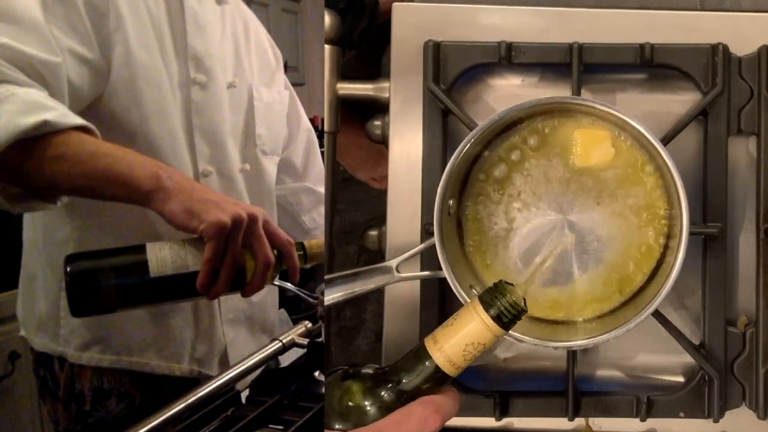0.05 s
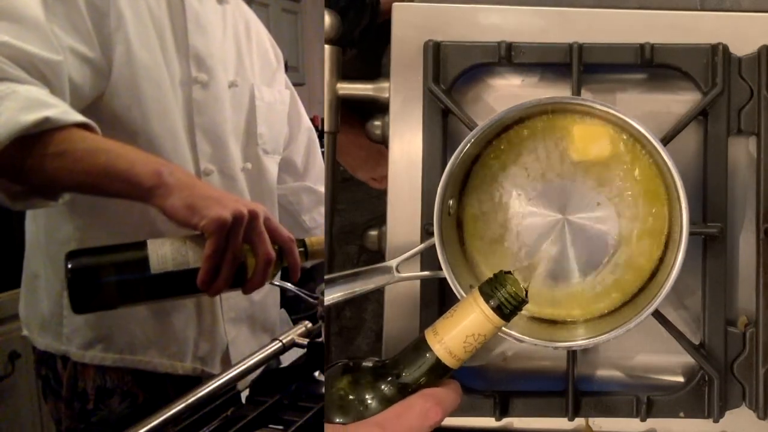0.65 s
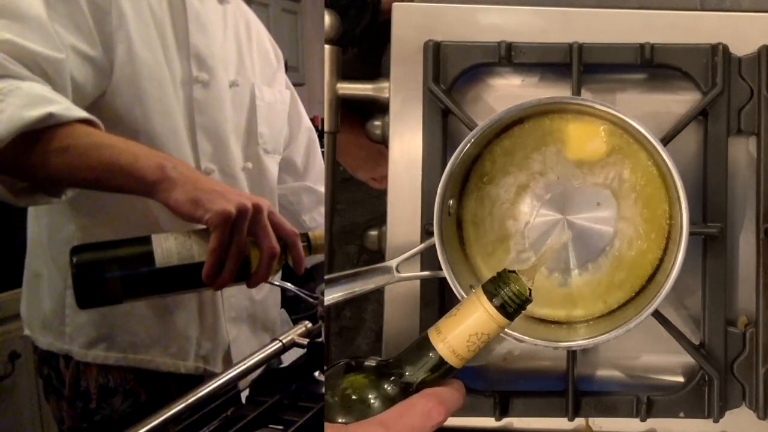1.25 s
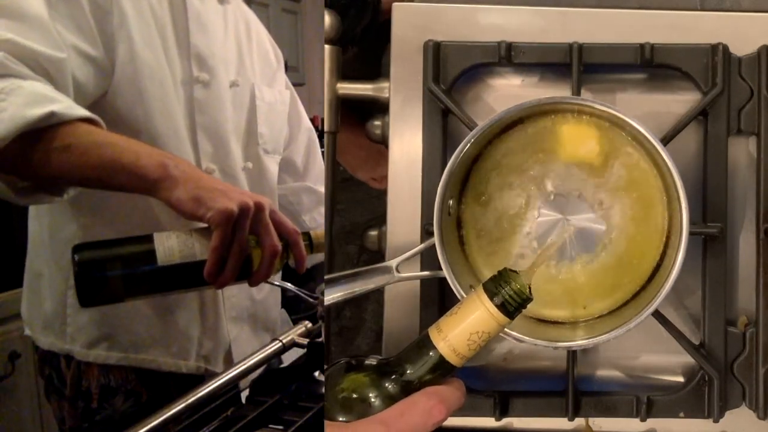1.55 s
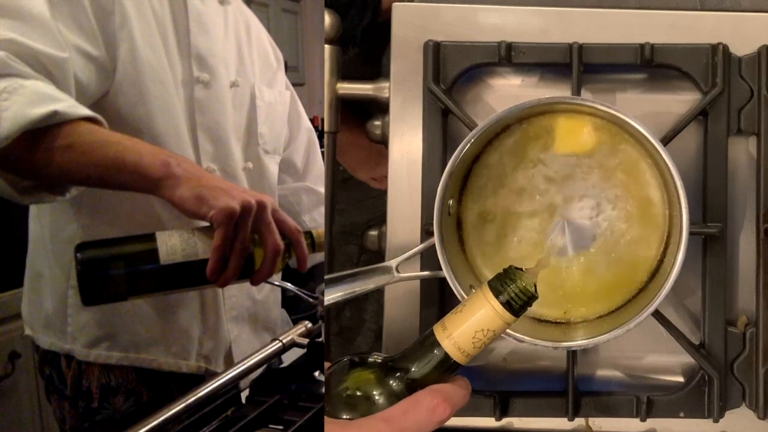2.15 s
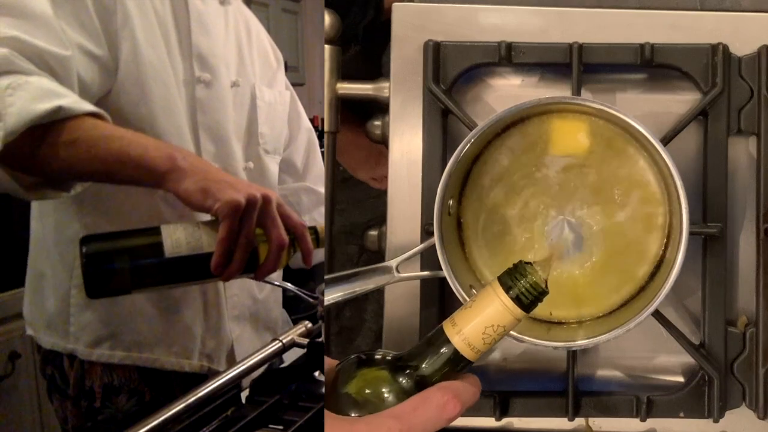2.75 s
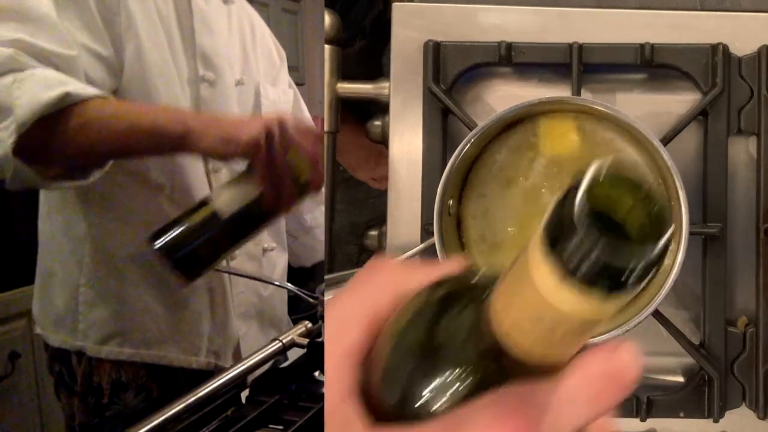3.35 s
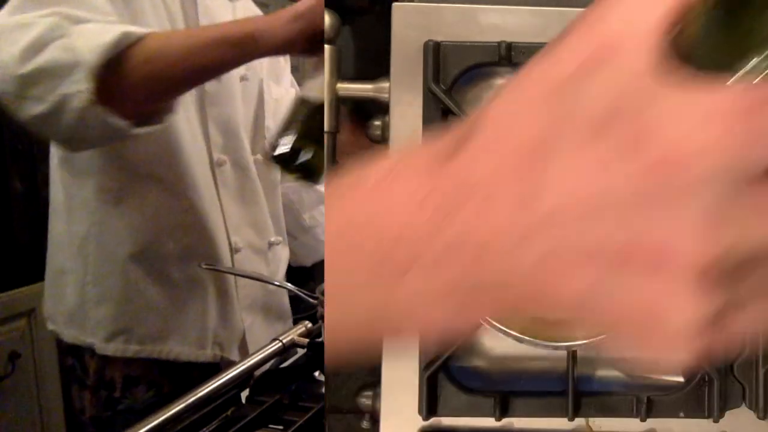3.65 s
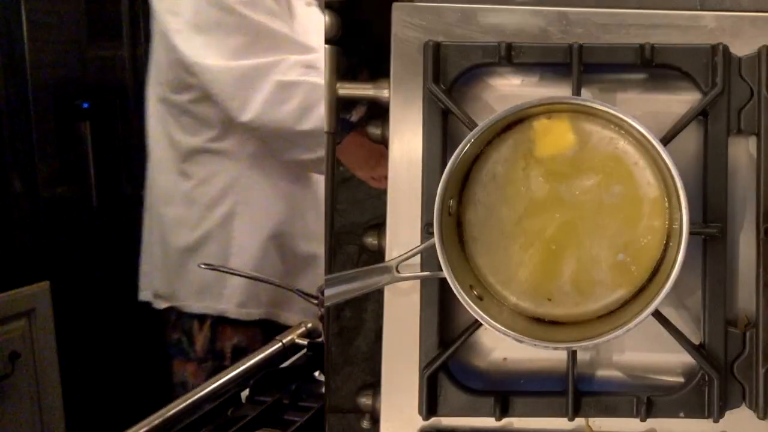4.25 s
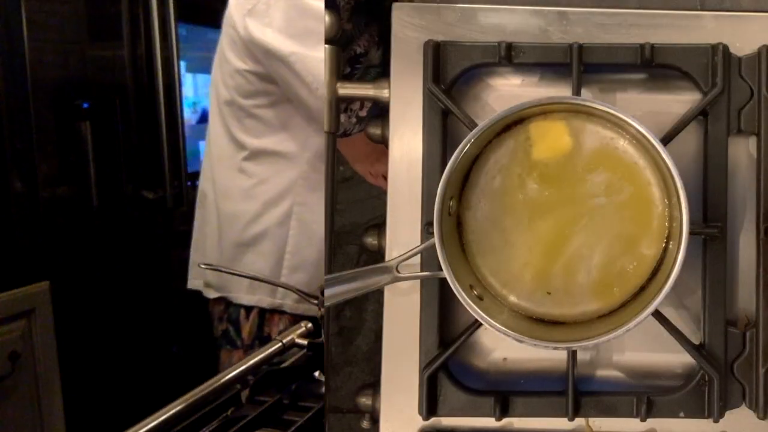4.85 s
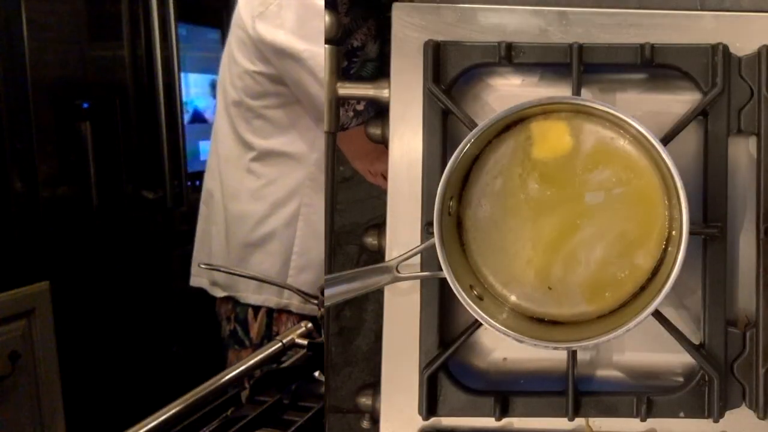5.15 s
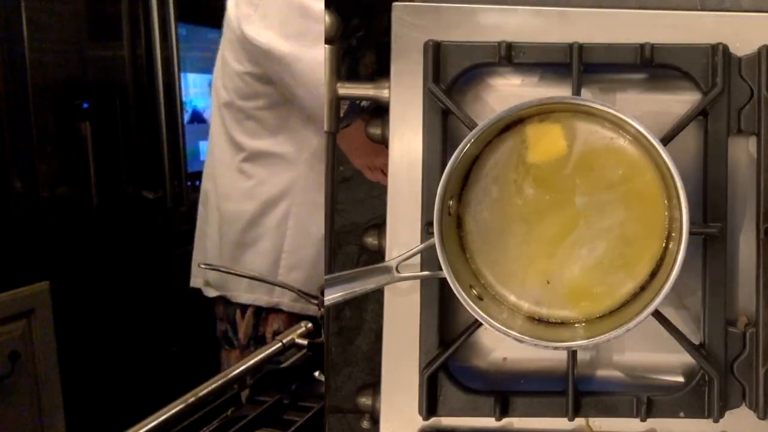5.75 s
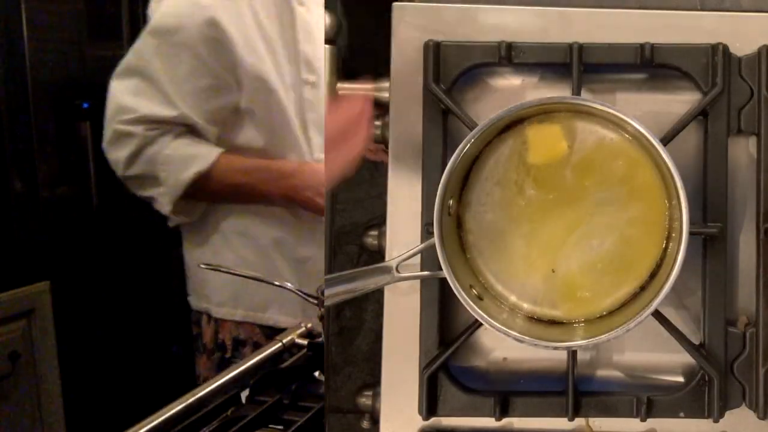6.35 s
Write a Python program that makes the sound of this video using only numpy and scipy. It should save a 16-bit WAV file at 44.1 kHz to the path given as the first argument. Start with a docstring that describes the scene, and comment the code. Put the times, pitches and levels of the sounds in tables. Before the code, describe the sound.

Wine splashes into a hot buttered pan, crackling and spitting, then a glass bottle knocks down hard and rocks beside the stove.

```python
"""A small kitchen, one microphone close to the stove. Wine is poured into a hot steel pan of butter and oil.
It splashes, and its drops flash to steam under the fat: short pitched spits, dry pops and round bubble
notes over a crackle and a fine fizz, all ringing in the pan and dying down as it cools. The bottle is then
set down hard beside the stove and rocks three times on its base. The gas burner rushes faintly behind."""
import sys
import numpy as np
from scipy import signal
from scipy.fft import rfft, irfft, next_fast_len
from scipy.io import wavfile
from scipy.ndimage import uniform_filter1d

SR = 44100
rng = np.random.default_rng(int(sys.argv[2]) if len(sys.argv) > 2 else 0)


def store_pcm(level_fs):
    """Save levels as 16-bit WAV."""
    pcm = np.round(np.clip(level_fs, -1, 1) * 32767).astype(np.int16)
    wavfile.write(sys.argv[1], SR, np.atleast_2d(pcm).T)


N = 282681
TIME = np.arange(N) / SR

# Levels in the tables are relative: each source adds its own gain.
# the loudest single steam bursts: (time [s], pitch [Hz], level [dB])
STEAM_SPITS = [(0.043, 6780, -25), (0.061, 6200, -31.5), (0.065, 4290, -29.5), (0.08, 3945, -28.5),
               (0.102, 9700, -35), (0.146, 6370, -28), (0.146, 3960, -32), (0.148, 9380, -32.5),
               (0.217, 8300, -36), (0.281, 3970, -33.5), (0.302, 3580, -29), (0.315, 3820, -28),
               (0.329, 6220, -29), (0.352, 6980, -23), (0.364, 4120, -30.5), (0.387, 4850, -29),
               (0.395, 8240, -21.5), (0.441, 4630, -28), (0.495, 3320, -31), (0.51, 7780, -26.5),
               (0.523, 5000, -29.5), (0.54, 3750, -29.5), (0.588, 3290, -33.5), (0.605, 4090, -32.5),
               (0.722, 3550, -41), (0.779, 6640, -28.5), (0.909, 6860, -34), (0.93, 7530, -32.5),
               (0.994, 9600, -33), (1.008, 3986, -31.5), (1.046, 4215, -30), (1.207, 5530, -36.5),
               (1.359, 4700, -31.5), (1.428, 5010, -29.5), (1.458, 2645, -33.5), (1.659, 9210, -24.5),
               (1.661, 4470, -29), (1.765, 7590, -28.5), (1.776, 5120, -32.5), (1.957, 3560, -29.5),
               (1.994, 4940, -30.5), (2.94, 5600, -31.5), (4.018, 7820, -38.5), (4.646, 6570, -37),
               (4.706, 6670, -38.5), (4.764, 8640, -35), (4.918, 8560, -45), (5.072, 7630, -41.5),
               (5.55, 7900, -35), (5.643, 7040, -36.5), (5.693, 7900, -36.5), (5.735, 4870, -43.5),
               (5.926, 6300, -38.5)]
# hot fat spits, a cooled pool only hisses: (time [s], spitting share [0-1], bubble pitch [Hz])
PAN_HEAT = [(0, 0.9, 5490), (.65, 0.9, 2560), (1.9, 0.6, 2930), (2.35, 0.45, 4040), (2.65, 0.04, 4520),
            (4.2, 0, 6400), (5.3, 0, 7070), (5.7, 0.89, 6270), (5.95, 0.9, 6030), (6.1, 0, 5920)]
# the simmer grows as wine gathers and dies down as the pan cools: (time [s], level [dB])
SIMMER_LEVEL = [(0, -43), (.23, -74.5), (.55, -67), (.72, -63.5), (.85, -58), (1.55, -60.5), (1.95, -50),
                (2.7, -52.5), (3.5, -53), (3.8, -58.5), (4.2, -69), (4.5, -60.5), (5.05, -69), (5.5, -65.5),
                (5.85, -60.5), (6.05, -66.5), (6.41, -78.5)]
# wine boils up on a hot patch: (time [s], hold [s], crackle [dB], fizz [dB], bubble pitch [Hz])
BOIL_UPS = [(0.02, 0.11, -51, -71, 5940), (0.276, 0.13, -45.5, -72, 4110), (0.409, 0.13, -44.5, -60, 3615),
            (0.743, 0.052, -51, -98, 3400), (0.831, 0.034, -54, -54, 2280), (0.893, 0.031, -54, -53, 7950),
            (0.988, 0.032, -49, -60, 3660), (1.192, 0.03, -47.5, -84, 4300),
            (1.353, 0.089, -51.5, -85, 3594), (1.689, 0.06, -51.5, -53, 3510),
            (1.838, 0.035, -46, -62, 4150), (1.974, 0.11, -38.5, -58, 3940),
            (2.077, 0.087, -39, -45.5, 4940), (2.231, 0.026, -47, -62, 4640),
            (2.38, 0.078, -35.5, -40.5, 3980), (2.533, 0.038, -45, -48, 6580),
            (2.718, 0.016, -57.5, -44.5, 7260), (2.872, 0.12, -45.5, -49.5, 5420),
            (3.189, 0.22, -47.5, -45.5, 5510), (4.246, 0.066, -60.5, -62, 6800),
            (5.542, 0.03, -51, -47.5, 7900), (5.624, 0.056, -61, -59, 6970),
            (5.703, 0.0177, -56.5, -84, 5040), (5.742, 0.031, -59.5, -57, 6940),
            (5.867, 0.032, -56, -78, 6100)]
# spectra of the cooled pool's hiss and of its finer fizz: (frequency [Hz], level [dB])
HISS_SPECTRUM = [(200, -52), (1000, -28), (1650, -9), (2300, -11.5), (3300, -4.5), (6300, -1),
                 (15000, -16.5)]
FIZZ_SPECTRUM = [(400, -60.5), (2000, -16.5), (6000, -7.5), (8500, 6.5), (11000, -2.5), (16000, 2)]
# oil bubbles snapping: (time [s], level [dB])
OIL_POPS = [(0.009, -28), (1.879, -27.5), (2.006, -24.5), (2.091, -26), (2.258, -27), (2.273, -26.5),
            (2.306, -23.5), (2.329, -21.5), (2.558, -28.5), (2.587, -28), (2.62, -26), (2.731, -34),
            (2.804, -25.5), (2.96, -32), (3.209, -33), (3.269, -21), (3.283, -23), (3.329, -24),
            (3.343, -26), (3.3595, -18), (3.493, -35), (4.47, -38), (4.845, -50), (4.95, -43)]
# mist thrown up where a drop bursts in the fat: (time [s], level [dB])
MIST_PUFFS = [(0.15, -43), (0.32, -44), (0.385, -39), (0.441, -38), (0.496, -41), (0.608, -44),
              (0.857, -37), (0.895, -43), (0.993, -37), (1.178, -57), (1.396, -49), (1.762, -39),
              (1.854, -50)]
# air bubbles in the deepening pool: (time [s], pitch [Hz], level [dB], width [s])
BUBBLE_NOTES = [(0.835, 1670, -44, 0.015), (1.937, 3260, -36.5, 0.0079), (2.331, 2920, -31.5, 0.0097),
                (2.361, 3400, -30, 0.01), (3.11, 2974, -40.5, 0.015), (3.215, 1386, -47, 0.013),
                (3.25, 2940, -40.5, 0.022), (3.388, 1630, -48, 0.016), (3.403, 3280, -39, 0.014)]
# gulps of wine landing, large bubbles breaking: (time [s], level [dB], plop against slap [dB])
GULPS = [(0.075, -48.5, 5), (0.463, -37, -0.5), (0.791, -39.5, 3.5), (0.829, -33.5, 0),
         (1.125, -40.5, -0.5), (1.181, -37, -4), (1.298, -38, -3), (1.366, -33.5, 7), (1.697, -37.5, -15),
         (1.716, -40.5, -5), (1.796, -35, 1), (1.952, -31, -16)]
# patter of the falling wine: (frequency [Hz], level [dB])
PATTER_SPECTRUM = [(100, -28), (330, -8.5), (650, -4.5), (1000, -8.5), (1600, -6), (2200, -13.5),
                   (3000, -1.5), (12000, -22)]
# the stream on the bare pan floor: (time [s], level [dB])
DRUMMING_LEVEL = [(.5, -110), (.6, -66), (1.3, -67), (2.05, -74.5), (3, -110)]
# the air in the pan and its steel wall: (frequency [Hz], level [dB], t60 [s])
PAN_RESONANCES = [(860, -8.5, 0.065), (1200, -9.5, 0.057), (1592, -1.5, 0.024), (1643, -3, 0.068),
                  (2990, -12, 0.03), (3240, -12, 0.057), (4130, -10, 0.017), (4470, -13, 0.0091),
                  (4940, -5.5, 0.017), (5560, -8, 0.03), (7050, -0.5, 0.014), (8500, -5, .012)]
# the bottle's base meets the counter: (time [s], level [dB], treble cutoff [Hz], glass ring [dB])
BOTTLE_BLOWS = [(5.0873, -4.5, 2900, -31), (5.0902, -0.5, 15300, -13), (5.0955, -8, 6350, -26),
                (5.108, -17, 9000, -34), (5.258, -11.5, 1320, -14), (5.283, -14, 775, -16),
                (5.358, -15.5, 1550, -9), (5.367, -15, 1520, -5), (5.457, -10, 1230, -18),
                (5.471, -16.5, 1530, -8.5)]
# counter and stove top ringing under the bottle: (frequency [Hz], level [dB], t60 [s])
COUNTER_MODES = [(135, -10, 0.53), (233, -9, 0.45), (276, -2.5, 0.41), (318.4, -3.5, 0.75),
                 (385, -2.5, 0.25), (443, 5, 0.29), (593, -4, 0.45), (776, 7.5, 0.14), (874, -1.5, 0.39),
                 (960, 10, 0.14), (1030, -6.5, 0.33), (1148, -1.5, 0.34), (1440, -1, 0.15),
                 (1607, -0.5, .12), (1736, 3, 0.17), (2620, 4.5, 0.14), (3004, 0.5, 0.31), (4720, -3, 0.19),
                 (4830, -3.5, 0.26)]
# their dense rattle: (frequency [Hz], level [dB])
RATTLE_SPECTRUM = [(29, -64.5), (50, -23), (111, -16), (291, -6), (1120, -7), (2620, -11.5), (3330, -17.5),
                   (4790, -14), (5150, -21), (7040, -21), (16000, -39)]
# the bottle's own ring: (frequency [Hz], level [dB], t60 [s])
BOTTLE_MODES = [(2283, -13.5, 0.35), (2565, -11, 0.15), (2634, -0.5, 0.088)]
# bumps and sloshes of the bottle in the hand: (time [s], pitch [Hz], level [dB], width [s])
HANDLING_BUMPS = [(3.56, 810, -56.5, 0.054), (4.425, 1100, -56.5, 0.029), (4.462, 1384, -46.5, 0.03),
                  (4.87, 899, -55.5, 0.055)]
# gas burner and room tone: (frequency [Hz], level [dB])
ROOM_SPECTRUM = [(24, -55), (40, -10), (127, -2), (305, 0), (382, -7), (516, -0.5), (965, -6), (1680, -5),
                 (2000, -9.5), (6820, 0), (16000, -49.5)]

STEAM_WAVER, BUBBLE_WAVER = 0.068, 0.042  # share by which a pitch wavers
TYPICAL_SPIT_HZ = 6046


def pan():
    """Everything that boils and splashes, heard direct and as it bounces round the pan and the room."""
    heat = np.clip(curve(PAN_HEAT), 0, 1)
    crackle_gain, fizz_gain, bubble_hz = boil_strength(heat)
    direct = sizzle(heat, crackle_gain, fizz_gain, bubble_hz)
    direct += stirred_pool(heat, crackle_gain) + drumming()
    direct += spits() + pops() + mists() + plinks() + splashes()
    steel = undb(-12) * ring(PAN_RESONANCES)
    pan_wall = undb(-11) * tail(0.043, 0.013, split_hz=4200)
    room = undb(-7) * tail(0.16, 0.063, split_hz=7000)
    return 0.5 * direct + signal.fftconvolve(direct, steel + pan_wall + room)[:N]


def spits(snap_db=-9, snap_t60=0.0046, typical_s=0.0046, typical_db=-32):
    """Loud steam bursts: high and violent ones are over soonest, and their oil film snaps hardest."""
    times, pitches, levels = np.transpose(STEAM_SPITS)
    haste = (pitches / TYPICAL_SPIT_HZ) ** 0.37 * undb(0.32 * (levels - typical_db))
    out = bursts(zip(times, pitches, levels, typical_s / haste), STEAM_WAVER)
    for s, hz, gain in zip(times, pitches, undb(levels + snap_db) * haste):
        snap = (rng.standard_normal(SR // 2) * fade(snap_t60))[:SR // 20]
        add(out, s, gain * cut(snap, [hz * 0.65, hz * 1.4], "band"))
    return out


def sizzle(heat, crackle_gain, fizz_gain, bubble_hz):
    """Coarse crackle and fine fizz: steam chirps in hot fat, bubbles tick and hiss in the cooled pool."""
    hot, cool = np.sqrt(heat), np.sqrt(1 - heat)
    skins = undb(-8) * unit(clicks(420, scatter_db=3.2))  # bubble skins breaking
    coarse = hot * crackle(600, bubble_hz, octaves=0.33, scatter_db=6.5, width_s=0.0035)
    coarse += cool * unit(colour(unit(ticks(220, scatter_db=4.6)) + skins, HISS_SPECTRUM))
    chirps = crackle(380, centre_hz=9300, octaves=0.4, scatter_db=7, width_s=0.0024, waver=BUBBLE_WAVER)
    fine = (0.77 + 0.31 * heat) * chirps
    fine += cool * unit(colour(unit(ticks(130, scatter_db=5)) + skins, FIZZ_SPECTRUM))
    # large and small bubbles come in clumps of their own
    coarse *= crackle_gain * undb(1 + 2.5 * sputter(70))
    fine *= fizz_gain * undb(2 + 2.5 * sputter(70))
    return coarse + fine


def boil_strength(heat, hot_fizz_db=-6, cool_fizz_db=-11, spray_db=-31.5):
    """Crackle gain, fizz gain and bubble pitch: the boils add in power, the strongest leads the pitch."""
    simmer = undb(curve(SIMMER_LEVEL))
    crackle_power = simmer ** 2
    fizz_power = (simmer * undb(heat * hot_fizz_db + (1 - heat) * cool_fizz_db)) ** 2
    weighted_hz = crackle_power * curve(PAN_HEAT, column=2)
    for s, hold, crackle_db, fizz_db, hz in BOIL_UPS:
        swell = surge(s, hold)
        power = (swell * undb(crackle_db)) ** 2
        crackle_power += power
        weighted_hz += power * hz
        fizz_power += (swell * undb(fizz_db)) ** 2
    for s, hz, db in STEAM_SPITS:  # each spit throws a spray of fizz, more when its pitch is high
        spray = fade(0.072) * undb(db + spray_db) * hz / TYPICAL_SPIT_HZ
        add(fizz_power, s, spray ** 2)
    return np.sqrt(crackle_power), np.sqrt(fizz_power), weighted_hz / crackle_power


def surge(start, hold, attack_s=0.0192):
    """A boil-up swells fast and holds while its patch is hot; a long one dies away more slowly."""
    rise = np.clip((TIME - start) / attack_s, 0, 1)
    release_s = 0.0226 + 0.246 * hold
    return rise * np.exp(-np.maximum(TIME - start - hold, 0) / release_s)


def pops(gain_db=1, t60=0.0115):
    """Each oil bubble cracks dryly for a few milliseconds, across the whole treble."""
    out = np.zeros(N)
    for s, db in OIL_POPS:
        add(out, s, undb(db + gain_db) * rng.standard_normal(SR // 2) * fade(t60))
    return cut(out, [6500, 12500], "band", order=1)


def mists(gain_db=-3, width_s=0.0034, scatter_s=0.0043, count=5):
    """Each puff of mist is a handful of tiny chirps at the very top of the treble."""
    chirps = []
    for s, db in MIST_PUFFS:
        times = rng.normal(s, scatter_s, count)
        pitches = rng.uniform(10500, 15500, count)
        chirps += [(when, hz, db + gain_db, width_s) for when, hz in zip(times, pitches)]
    return bursts(chirps, BUBBLE_WAVER)


def plinks():
    """Air bubbles sound round notes that gurgle in the moving pool."""
    return bursts(BUBBLE_NOTES, BUBBLE_WAVER)


def splashes(gain_db=-7, plop_db=-5.5, t60=0.063):
    """Each gulp slaps the liquid and adds a deep plop, each at its own strength."""
    out = np.zeros(N)
    swell = fade(t60) - fade(0.00074)
    for s, db, deep_db in GULPS:
        slap = unit(cut(rng.standard_normal(SR // 2), [1400, 3100], "band"))
        plop = unit(cut(rng.standard_normal(SR // 2), [420, 900], "band", order=3))
        add(out, s, undb(db + gain_db) * swell * (slap + undb(deep_db + plop_db) * plop))
    return out


def stirred_pool(heat, crackle_gain, start_s=0.26, end_s=3.58, rise_s=0.098, settle_s=0.2):
    """Falling wine patters and drags small air bubbles under; the boil churns the pool too."""
    patter = unit(colour(ticks(150, scatter_db=4.8), PATTER_SPECTRUM))
    bubbles = crackle(130, centre_hz=2396, octaves=0.42, scatter_db=6.5, width_s=0.0035)
    tipping = np.clip((TIME - start_s) / rise_s, 0, 1)
    settling = np.exp(-np.maximum(TIME - end_s, 0) / settle_s)
    pour = undb(-67 + 1.65 * TIME) * tipping * settling  # slowly louder while the stream runs
    churn, at_rest = undb(-29.5) * crackle_gain, undb(-81)
    return (patter + undb(3.5) * heat * bubbles) * (pour + churn + at_rest)


def drumming():
    """The stream drums on the bare pan floor until the pool covers it."""
    drum = unit(cut(rng.standard_normal(N), [1215, 1295], "band"))
    return drum * undb(curve(DRUMMING_LEVEL) + 3.5 * sputter(25))


def bottle(gain_db=11, glass_rise_s=0.011, counter_rise_s=0.008, mode_shift=0.005):
    """Beside the stove: one hard landing, then softer, duller blows as the bottle rocks to rest."""
    out = np.zeros(N)
    glass = cut(ring(BOTTLE_MODES) * (1 - fade(glass_rise_s)), [2100, 3000], "band")
    for s, db, bright_hz, glass_db in BOTTLE_BLOWS:
        # each blow lands on another spot, so the counter's modes answer a little differently
        modes = [(hz * (1 + mode_shift * rng.uniform(-0.83, 1)), level, t60)
                 for hz, level, t60 in COUNTER_MODES]
        counter = undb(-3) * ring(modes) * (1 - fade(counter_rise_s))
        rattle = cut(tail(0.3, 0.22, split_hz=2100), 10000, "low")
        crack = undb(db - 2) * tail(0.027, 0.06, split_hz=2500)  # only a hard blow cracks
        body = unit_energy(colour(rattle + crack, RATTLE_SPECTRUM)) + counter
        knock = cut(body, bright_hz, "low", order=4)
        add(out, s, undb(db + gain_db) * (knock + undb(glass_db) * glass))
    return cut(out, 105, "high", order=4)  # the stiff counter gives no deep boom


def handling():
    """The bottle bumps and sloshes softly in the hand."""
    return bursts(HANDLING_BUMPS, waver=0.182)


def kitchen(level_db=-70):
    """In the background, the steady rush of the gas burner and the room."""
    return undb(level_db) * unit(colour(rng.standard_normal(N), ROOM_SPECTRUM))


def burst(hz, width_s, waver, glide=0.03):
    """A wavering, sliding whistle like steam squeezing through fat; four widths long, peaking midway."""
    position = np.linspace(-2, 2, int(4 * width_s * SR))
    wobble = unit(uniform_filter1d(rng.standard_normal(len(position)), size=int(2 * SR / hz)))
    pitch = hz * (1 + glide * rng.uniform(-1, 1) * position + waver * wobble)
    return np.exp(-2 * np.abs(position)) * np.sin(2 * np.pi * np.cumsum(pitch) / SR)


def bursts(rows, waver):
    """Whistles from (time [s], pitch [Hz], level [dB], width [s]), each peaking at its time."""
    out = np.zeros(N)
    for s, hz, db, width_s in rows:
        whistle = burst(hz, width_s, waver)
        add(out, s - len(whistle) / SR / 2, undb(db) * whistle)
    return out


def crackle(per_second, centre_hz, octaves, scatter_db, width_s, waver=STEAM_WAVER):
    """Many small bursts of scattered level and length, pitched round a centre that may move."""
    out, centre = np.zeros(N), np.broadcast_to(centre_hz, N)
    count = int(per_second * N / SR)
    starts = rng.integers(0, N, count)
    scatter = np.clip(rng.standard_normal((count, 3)), -2, 2)
    for i, (pitch, size, length) in zip(starts, scatter):
        whistle = burst(centre[i] * 2 ** (octaves * pitch), width_s * 2 ** (length / 2), waver)
        add(out, i / SR, undb(scatter_db * size) * whistle)
    return unit(out)


def ticks(per_second, scatter_db):
    """Tiny bubbles of 40 sizes, each size breaking at this rate and ringing briefly at its own pitch."""
    return sum(cut(clicks(per_second, scatter_db), [hz / 1.045, hz * 1.045], "band", order=1)
               for hz in np.geomspace(350, 16000, 40))


def clicks(per_second, scatter_db):
    """Sharp clicks at random moments, a few much louder than the rest."""
    place, chance, sign = rng.random((int(per_second * N / SR), 3)).T
    db = scatter_db * np.minimum(-np.log(1 - chance), 4.5)
    return np.bincount((place * N).astype(int), undb(db) * np.sign(sign - 0.5), N)


def sputter(per_second):
    """Smooth random swings with a spread near 1."""
    count = int(per_second * N / SR) + 2
    return np.interp(TIME * per_second, np.arange(count), rng.standard_normal(count))


def ring(modes):
    """Damped modes, all set going at once."""
    t = TIME[:SR // 2]
    return unit_energy(sum(undb(db) * fade(t60) * np.cos(2 * np.pi * hz * t) for hz, db, t60 in modes))


def tail(t60_low, t60_high, split_hz):
    """Dense reflections whose bass and treble die at their own rates."""
    noise = rng.standard_normal(SR // 2)
    low = cut(noise, split_hz, "low", order=1)
    return unit_energy(low * fade(t60_low) + (noise - low) * fade(t60_high))


def fade(t60):
    """Half a second of exponential decay."""
    return np.exp(-np.log(1000) * TIME[:SR // 2] / t60)


def colour(x, spectrum):
    """Filter by (frequency [Hz], level [dB]) points."""
    hz, db = np.transpose(spectrum)
    size = next_fast_len(2 * len(x))
    bins_hz = np.maximum(np.fft.rfftfreq(size, 1 / SR), 1)
    gain = undb(np.interp(np.log(bins_hz), np.log(hz), db))
    return irfft(rfft(x, size) * gain, size)[:len(x)]


def cut(x, hz, kind, order=2):
    """Butterworth filter."""
    return signal.sosfilt(signal.butter(order, hz, kind, fs=SR, output="sos"), x)


def curve(rows, column=1):
    """One column of a table, joined by straight lines in time."""
    rows = np.array(rows)
    return np.interp(TIME, rows[:, 0], rows[:, column])


def add(out, s, x):
    """Mix x in at time s."""
    i = max(int(s * SR), 0)
    out[i:i + len(x)] += x[:max(N - i, 0)]


def undb(db):
    """Decibels to gain."""
    return 10 ** (np.asarray(db) / 20)


def unit(x):
    """Scale to rms 1."""
    return x / np.sqrt(np.mean(x ** 2))


def unit_energy(x):
    """Scale a response to pass noise at gain 1."""
    return x / np.sqrt(np.sum(x ** 2))


def scene():
    """Pan, bottle and room tone at one microphone by the stove."""
    return (pan() + bottle() + handling() + kitchen())[None]


def record(dry, low_cut_hz=67.75, top_hz=15900):
    """The microphone loses the deep bass, and the top is cut off steeply."""
    thin = cut(dry, low_cut_hz, "high")
    return signal.sosfilt(signal.ellip(10, 0.2, 70, top_hz, fs=SR, output="sos"), thin)


dry = scene()
out = record(dry)
store_pcm(out)
```